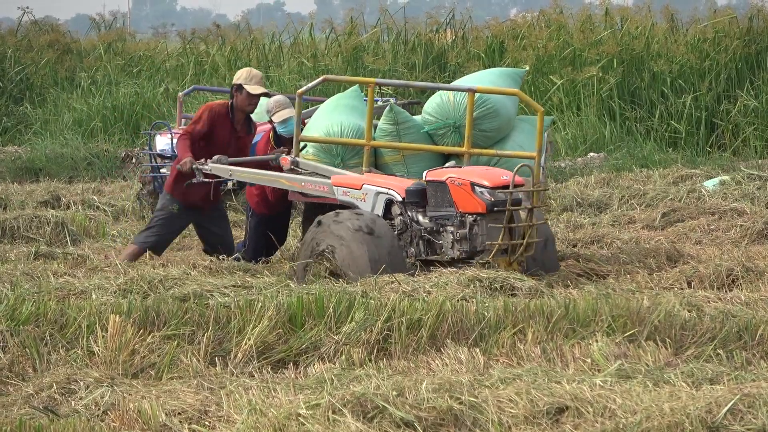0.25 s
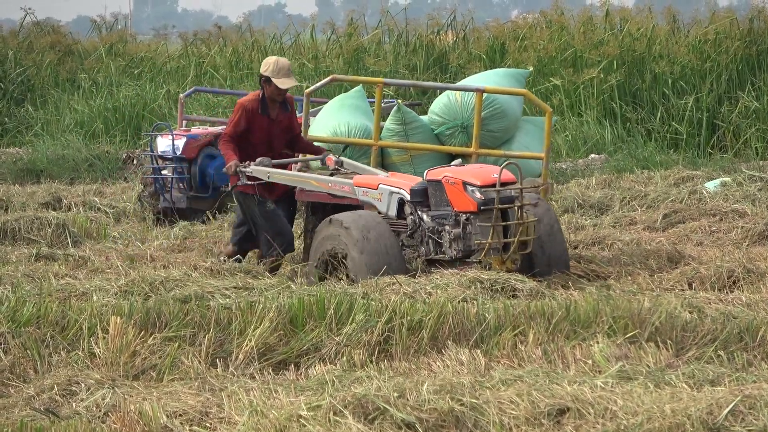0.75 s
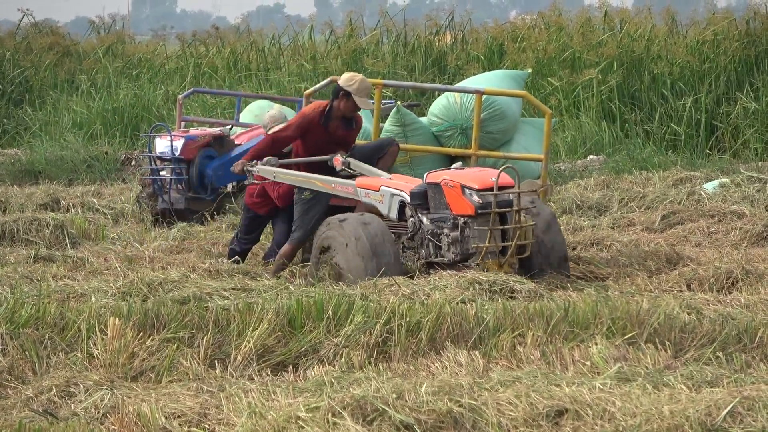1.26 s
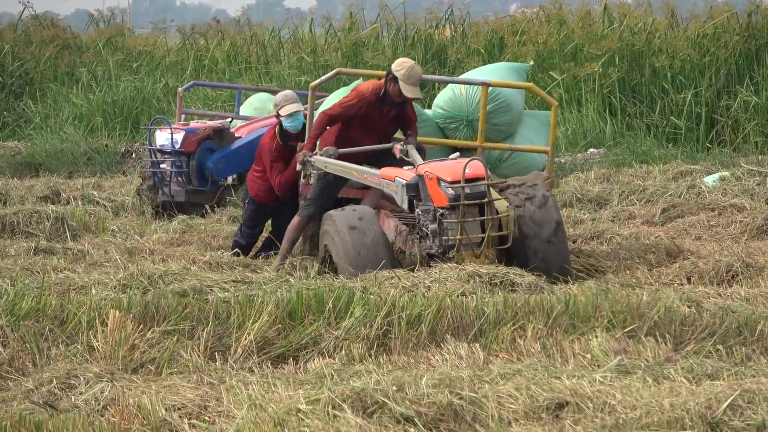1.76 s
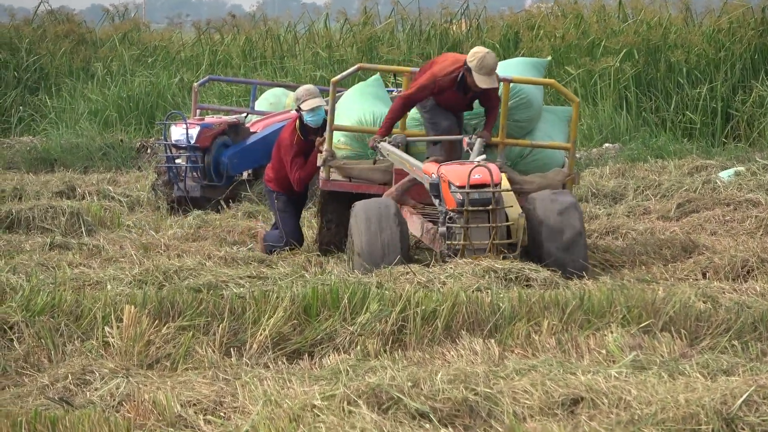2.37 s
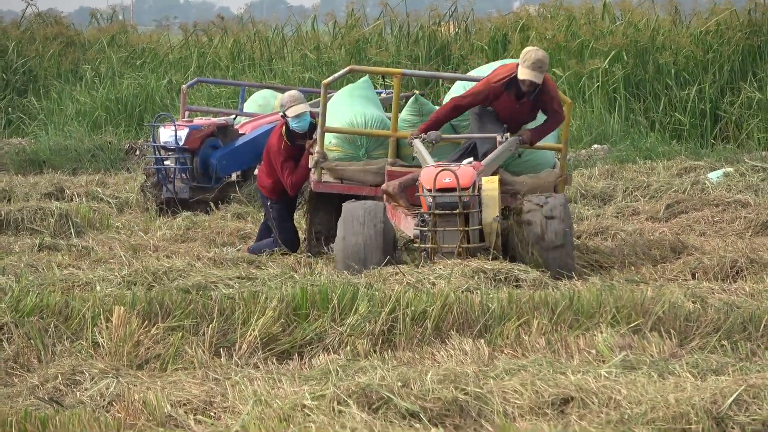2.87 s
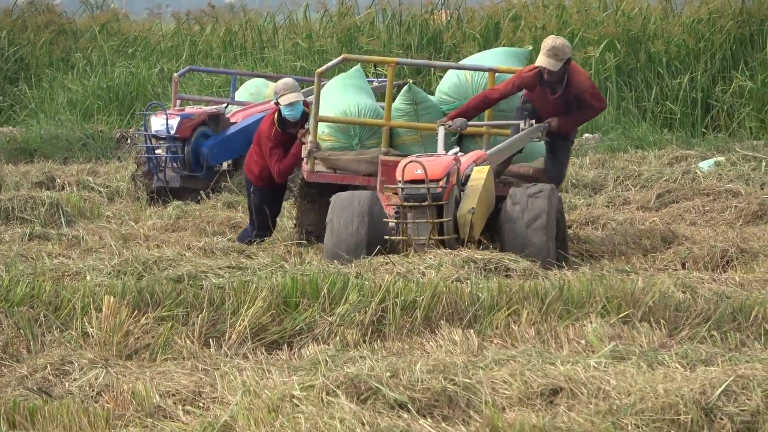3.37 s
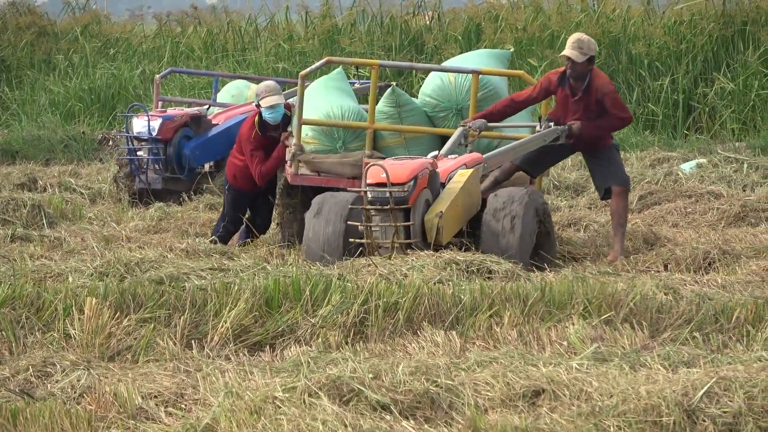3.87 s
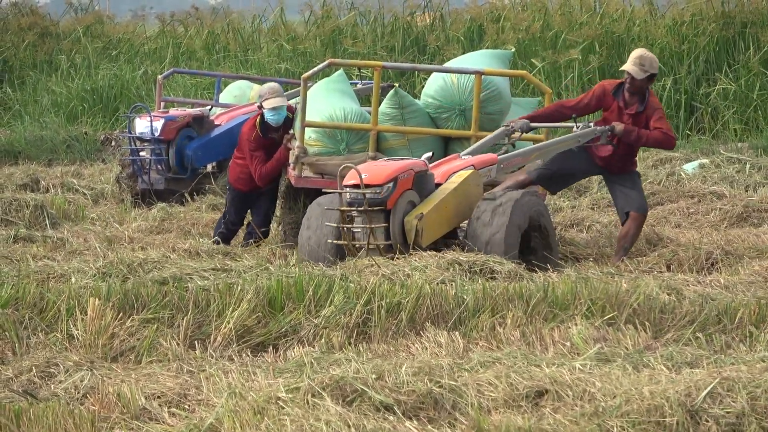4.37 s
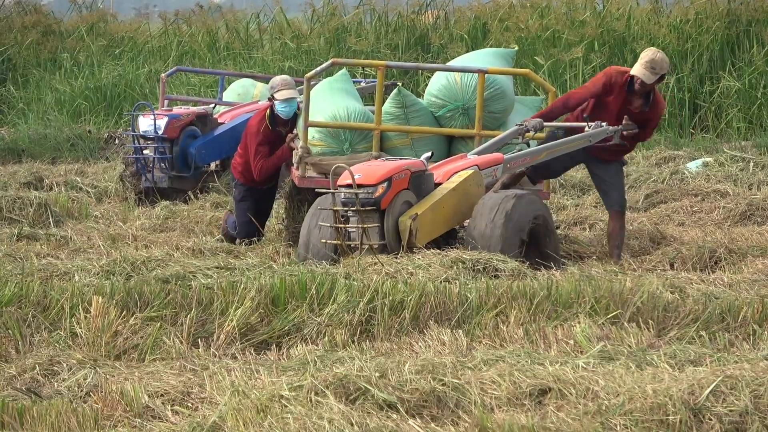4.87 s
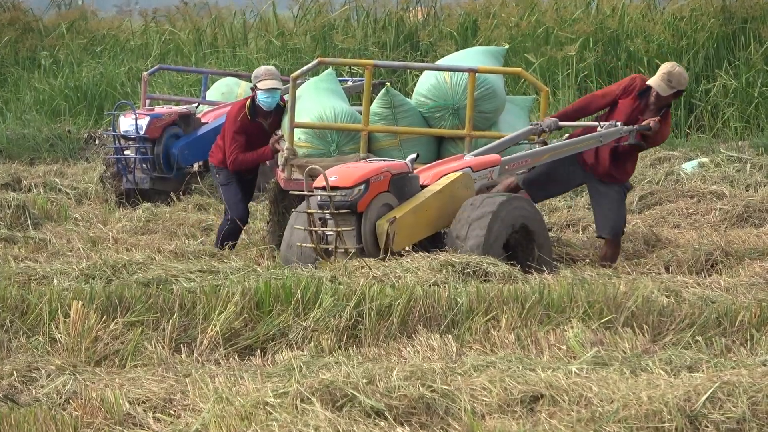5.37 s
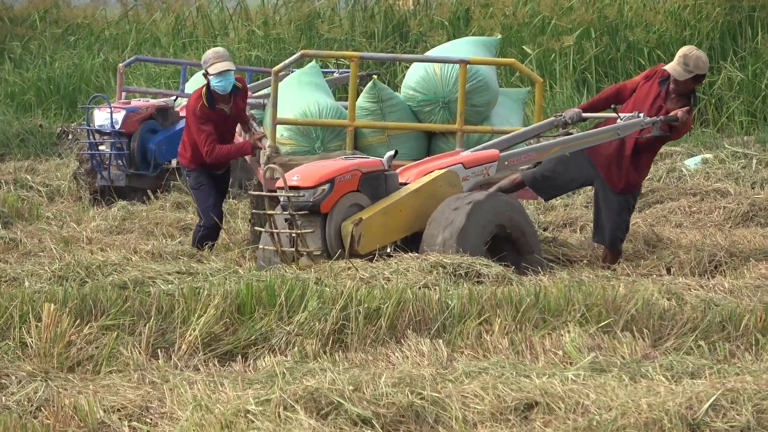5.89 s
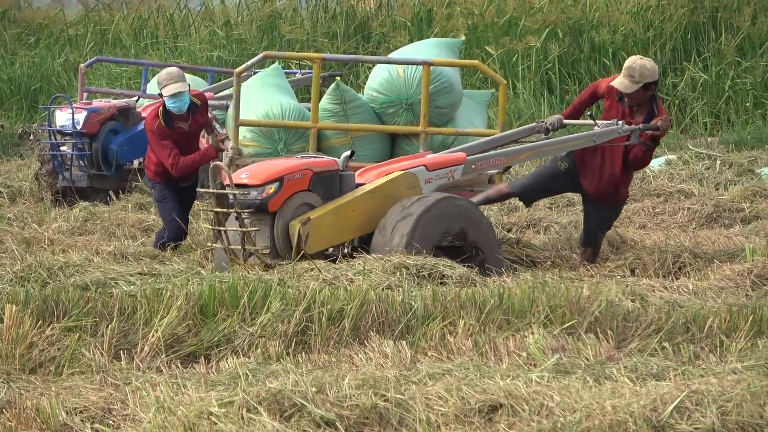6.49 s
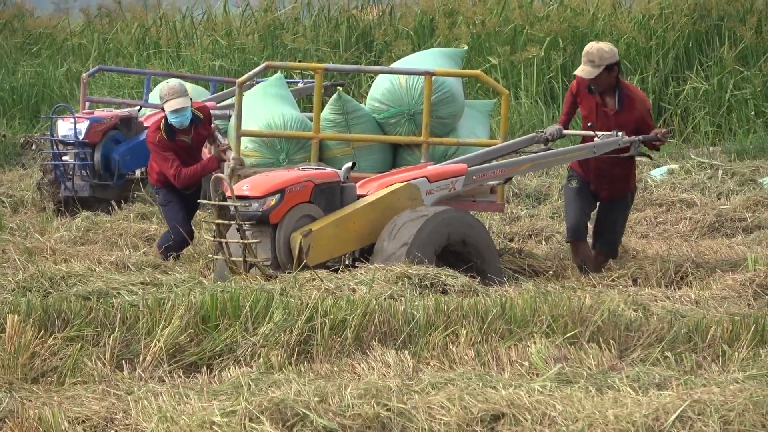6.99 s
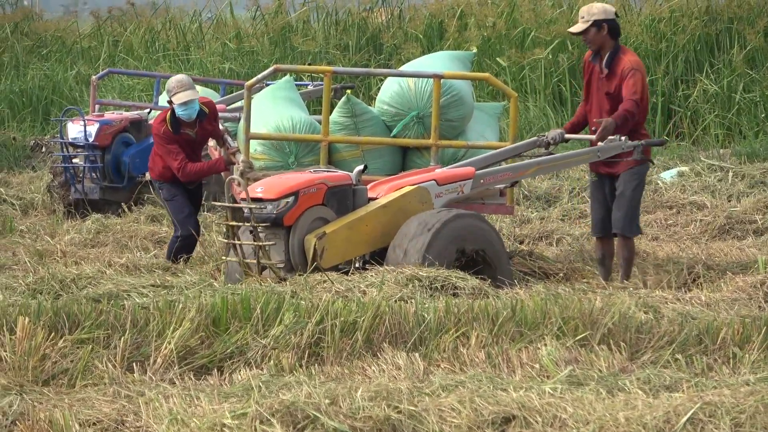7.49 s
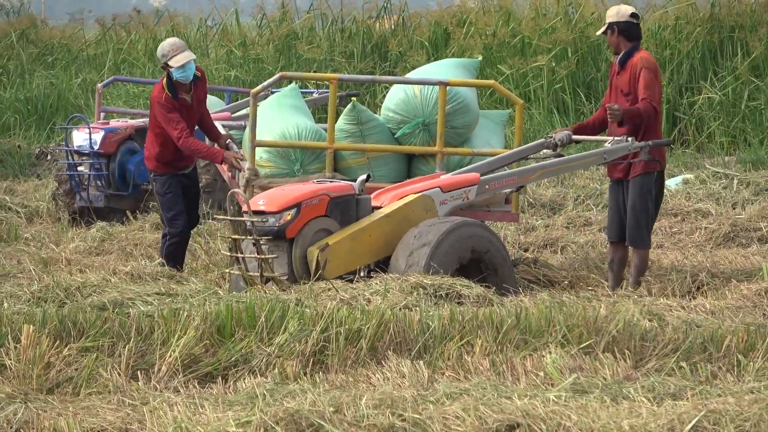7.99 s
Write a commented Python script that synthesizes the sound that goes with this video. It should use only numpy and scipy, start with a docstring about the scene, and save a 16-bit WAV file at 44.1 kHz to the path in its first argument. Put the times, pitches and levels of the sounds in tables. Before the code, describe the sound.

In an open field, a single-cylinder diesel walking tractor chugs about sixteen times a second, each beat a raspy exhaust puff, low thud and metallic knock over gear whirr. It surges under load, then near the end the throttle closes and it softens and slows. Wind rumbles, flutters and slaps the microphone, sometimes overloading it; tiny bird chirps are barely audible. Mono, dry, outdoors, at moderate distance.

```python
"""The uneven chug of a single-cylinder four-stroke diesel tractor, labouring in mud and swinging round.
Each cycle joins a noisy exhaust blast, low gas thuds and a combustion knock that rings block and casing;
fan, belt and gears whirr and whine. Near the end the throttle is shut and the engine runs down.
Wind noise rumbles, flutters and slaps on the microphone and now and then overloads it.
A faint bird whistles in short glides over the steady background hiss of the microphone."""
import sys
import numpy as np
from scipy import signal
from scipy.fft import rfft, irfft, next_fast_len
from scipy.io import wavfile
from scipy.ndimage import uniform_filter1d, map_coordinates

SR = 44100
rng = np.random.default_rng(int(sys.argv[2]) if len(sys.argv) > 2 else 0)


def generate_wav(signal):
    """Clip the signal to [-1, 1] and save it as 16-bit WAV at the path in sys.argv[1]."""
    frames = np.transpose(np.atleast_2d(signal))
    scaled = np.clip(frames, -1, 1) * 32767
    pcm = np.round(scaled).astype(np.int16)
    wavfile.write(sys.argv[1], SR, pcm)


N = 363384

# How hard the engine pulls as the wheels bite and slip. Each row: time in seconds, load in dB.
LOAD = [(0.0, -8), (0.55, -5), (0.68, -10), (1.05, -3), (1.91, -13), (2.34, 2.5), (3.07, -3), (3.2, -5.5),
        (3.44, 7.5), (4.06, -7), (4.67, 2), (4.86, -0.5), (5.04, 6), (5.23, -1.5), (5.66, 4), (6.09, -1.5),
        (6.4, 5), (7.26, 1), (7.38, -16), (8.24, -19.5)]
# How openly the engine's side faces the microphone as the tractor swings round.
# Each row: time in seconds, level in dB.
FACING = [(0, 8.5), (1.3, 4.5), (1.85, -2), (3.5, -2), (5, -0.5), (6.5, 2.5), (7.25, 2.5)]


def amp(db):
    """Decibels to gain."""
    return 10 ** (np.asarray(db) / 20)


def unit(x):
    """Scale to rms 1."""
    return x / np.sqrt(np.mean(x ** 2) + 1e-20)


def curve(rows):
    """Draw straight lines between (seconds, value) rows, one value per sample."""
    s, values = np.transpose(rows)
    return np.interp(np.arange(N) / SR, s, values)


def wobble(rate):
    """A smooth random curve with rate knots a second."""
    knots = rng.standard_normal(int(N * rate / SR) + 4)
    return map_coordinates(knots, [np.arange(N) * rate / SR])


def filtered(x, response):
    """Multiply the spectrum of x by a response of frequency in Hz."""
    size = next_fast_len(N + SR // 2)
    hz = np.fft.rfftfreq(size, 1 / SR)
    return irfft(rfft(x, size) * response(hz), size)[:N]


def noise(spectrum, envelope=1):
    """Noise of rms 1, shaped in time and then coloured by (Hz, dB) points on a log frequency scale."""
    points_hz, db = np.transpose(spectrum)

    def colour(hz):
        return amp(np.interp(np.log(hz + 1), np.log(points_hz), db))

    return unit(filtered(envelope * rng.standard_normal(N), colour))


def cycles():
    """Engine cycles run so far; one cycle is two turns of the crank, with one firing."""
    # Each row: time in seconds, firings per second.
    speed = [(0.0, 16.311), (0.9, 16.268), (1.3, 16.515), (2.0, 16.279), (2.5, 16.322), (3.1, 16.113),
             (3.8, 16.335), (5.0, 16.35), (6.4, 16.347), (7.2, 16.511), (7.4, 15.342), (7.65, 14.934),
             (8.24, 11.903)]
    start = .508  # share of the cycle already run at time zero
    return start + np.cumsum(curve(speed)) / SR


def strokes(degrees, scatter_db, jitter, advance=0):
    """One impulse a cycle at a crank angle, uneven in size (dB) and time (s); advance (degrees) is earlier."""
    run = cycles() + advance / 720
    marks = np.arange(int(run[-1]) + 1) + degrees / 720
    marks = marks[(marks > run[0]) & (marks < run[-1])]
    chance = rng.standard_normal((len(marks), 2))
    at = np.interp(marks, run, np.arange(N)) + jitter * SR * chance[:, 0]
    return np.bincount(np.clip(at, 0, N - 1).astype(int), amp(scatter_db * chance[:, 1]), N)


def ring(modes, blows, scatter_db, jitter, advance=0):
    """Decaying modes struck at crank angles, each at a new strength every time; each ring is cut at 0.1 s."""
    t = np.arange(SR // 10) / SR
    attack = 1 - np.exp(-t / .001)
    out = np.zeros(N)
    for hz, db, t60 in modes:
        hits = np.zeros(N)
        for degrees, blow_db in blows:
            hits += amp(blow_db) * strokes(degrees, scatter_db, jitter, advance)
        mode = attack * amp(db - 60 * t / t60) * np.sin(2 * np.pi * hz * t)
        out += signal.oaconvolve(hits, mode)[:N]
    return unit(out)


def run_down(drop_db, fade_db_per_s):
    """Level change in dB once the throttle is shut: a quick drop, and a steady fade as the flywheel slows."""
    shut_s, drop_takes_s = 7.18, 0.44
    since = np.maximum(np.arange(N) / SR - shut_s, 0)
    return -drop_db * np.minimum(since / drop_takes_s, 1) - fade_db_per_s * since


def mottled(x, depth_db, width_hz):
    """Give every engine cycle a slightly different colour, by a random gain over frequency."""
    hz, s, z = signal.stft(x, SR, nperseg=256)
    cycle = np.interp(s * SR, np.arange(N), cycles())
    knots = rng.standard_normal((64, 256))
    grid = np.meshgrid(hz / width_hz, np.floor(cycle), indexing="ij")
    field = map_coordinates(knots, grid, mode="nearest")
    return signal.istft(z * amp(depth_db * field), nperseg=256)[1][:N]


def exhaust():
    """The valve opens on a jet of gas that swells and dies in milliseconds; load makes it louder and brighter."""
    # Two colours of the blast. Each row: frequency in Hz, relative level in dB per Hz.
    hiss = [(1800, -39), (3200, -4), (4200, -3), (4800, -1.5), (5500, 2), (6150, -9.5), (6980, -1),
            (7300, -10.5), (10500, -9.5), (13000, -17.5), (15800, -32)]
    rasp = [(250, -27), (500, -14), (780, -15.5), (1000, -7), (1220, 3), (1600, -3.5), (2000, -.5),
            (2600, -2), (3400, -3), (4100, -7.5), (5000, -8), (8000, -42.5)]
    # Treble of the blasts, over what the load gives. Each row: time in seconds, level in dB.
    treble = [(0, 7), (1.1, 2), (1.35, -3), (1.8, 7), (2.3, -5), (2.55, -9), (3, 4.5), (3.55, 0), (3.8, 3),
              (5.1, -4), (5.55, -3.5), (5.9, 3.5), (6.6, -3.5), (7.25, -3.5), (7.8, 2.5)]
    load_db = curve(LOAD)
    # level at load 0, then dB per dB of load
    hiss_db = -45 + 1.3 * load_db + curve(treble)
    rasp_db = -43.5 + 0.96 * load_db

    swell_s, die_s = 0.003, 0.0023
    tail_db, tail_s = -13.5, 0.015  # scatter off the trailer
    intake_db, intake_after_s, intake_s = -21, 0.013, .0015  # the short hiss of air that follows
    t = np.arange(-SR // 10, SR // 10 + 1) / SR
    before, after = np.minimum(t, 0), np.maximum(t, 0)
    swell = np.exp(-np.abs(before / swell_s) ** 1.5)
    decay = np.exp(-(after / die_s) ** 1.2) + amp(tail_db) * np.exp(-after / tail_s)
    jet = swell * decay
    intake = amp(intake_db) * np.exp(-((t - intake_after_s) / intake_s) ** 2)
    short_jet = np.interp(t / 0.79, t, jet)  # the hiss lasts 0.79 times as long as the rasp

    out = np.zeros(N)
    # the jet is turbulent: its rasp and its hiss sputter on their own
    for spectrum, shape, db in (hiss, short_jet + intake, hiss_db), (rasp, jet, rasp_db):
        firings = strokes(degrees=200, scatter_db=1.2, jitter=.0002)
        sputter = amp(wobble(500))
        blasts = signal.oaconvolve(firings, shape, "same")
        out += amp(db) * noise(spectrum, sputter * blasts)
    return mottled(out, depth_db=2.5, width_hz=1227)


def thuds():
    """Exhaust opening, intake opening and intake closing each push out a low pulse; the cavities hum along."""
    # Gas pulses of one cycle. Each row: crank degrees after firing, relative level in dB,
    # centre in Hz, half length in seconds.
    pulses = [(202.5, 2.5, 192, 0.0022), (404.2, -1.5, 282, .0024), (598.7, 0, 143, 0.0019)]
    # Muffler and air cleaner. Each row: frequency in Hz, relative level in dB, 60 dB decay time in seconds.
    cavities = [(136, 5, 0.065), (292.7, -8, 0.4), (373.5, 2.5, 0.088), (444.5, -6, 0.075),
                (501, -11.5, 0.054), (615, -11, 0.044)]
    t = np.arange(-SR // 50, SR // 50 + 1) / SR
    out = np.zeros(N)
    for degrees, db, hz, length in pulses:
        pulse = amp(db) * np.cos(2 * np.pi * hz * t) * np.exp(-(t / length) ** 2)
        out += signal.oaconvolve(strokes(degrees, scatter_db=1, jitter=.00004), pulse, "same")
    hum = ring(cavities, [(190, 0)], scatter_db=1.2, jitter=.00004)
    # thuds weaken as the load drops; the negative fade only slightly offsets this
    thud_db = -32 + 0.27 * curve(LOAD) + run_down(drop_db=0, fade_db_per_s=-0.5)
    return amp(thud_db) * (unit(out) + amp(-10) * hum)


def knock():
    """Combustion, piston slap and valve ring the block; only combustion is sharp enough to crack the casing."""
    # Combustion first, then the other blows on the block.
    # Each row: crank degrees after firing, relative level in dB.
    blows = [(-16, -2.5), (66, -4.5), (175.5, 1.5), (392, -11)]
    # Engine block and thin casing. Each row: frequency in Hz, relative level in dB, 60 dB decay in seconds.
    block_modes = [(1065, -10, 0.06), (1174, -2, 0.041), (1230, -2, 0.068), (1321, 4, 0.02),
                   (1433, -3.5, 0.043)]
    casing_modes = [(2770, -7, 0.11), (3055, 4.5, 0.026), (3310, -2, 0.062), (3400, -9.5, 0.012)]
    # The crack of ignition. Each row: frequency in Hz, relative level in dB per Hz.
    crack_spectrum = [(700, -13), (1100, -3.5), (1420, 10.5), (1700, -12), (2400, -3), (3100, -9.5),
                      (3900, -10), (5400, -17), (7500, -25.5), (15000, -36.5)]
    # The fuel ignites earlier or later as the load changes. Each row: time in seconds, advance in crank degrees.
    timing = [(0, 14), (1.6, 14), (3.5, 6), (5, -4), (7.3, -10)]
    # Rise and fall of the block's ring. Each row: time in seconds, relative level in dB.
    block_level = [(0, -3), (1.35, 3), (1.66, -9), (2.03, 6.5), (3.2, -3.5), (3.44, 4), (3.87, -9),
                   (4.06, 6), (5.66, 3.5), (5.96, 1), (6.95, 0), (7.25, 2)]
    advance = curve(timing)
    block = ring(block_modes, blows, scatter_db=2, jitter=.0001, advance=advance)
    casing = ring(casing_modes, blows[:1], scatter_db=2, jitter=.00015, advance=advance)

    t = np.arange(SR // 20) / SR
    shock = (np.exp(-t / .002) + .15 * np.exp(-t / .01)) * (1 - np.exp(-t / .0006))
    ignitions = strokes(degrees=-18, scatter_db=1.5, jitter=.0001, advance=advance)
    crack = noise(crack_spectrum, signal.oaconvolve(ignitions, shock)[:N])

    block_db = curve(block_level) - 45.5 + run_down(drop_db=6, fade_db_per_s=17.5)
    ignition_db = curve(FACING) + run_down(drop_db=15.5, fade_db_per_s=12)
    casing_db = 0.06 * advance - 57  # early ignition rings the casing harder, in dB per degree
    return amp(block_db) * block + amp(ignition_db) * (amp(casing_db) * casing + amp(-53.0) * crack)


def running_gear():
    """Fan, belt and gears whirr, loudest with their side in view; one gear mesh whines in step with the crank."""
    # Colour of the whirr. Each row: frequency in Hz, relative level in dB per Hz.
    whirr_spectrum = [(150, -16.5), (400, 17), (750, -4), (1250, 6), (1750, -3.5), (3100, -5), (4000, -8.5),
                      (5500, -10), (6200, -22.5), (6950, -16), (7500, -21), (11000, -23.5), (15800, -30.5)]
    # Whine of the gears before the run-down. Each row: time in seconds, level in dB.
    whine_level = [(0, -62), (1, -53.5), (1.4, -72), (1.8, -55.5), (3, -71), (3.7, -58), (5.5, -61.5),
                   (6.3, -53), (7.25, -56.5)]
    whirr_db = .62 * curve(FACING) - 44.5 + run_down(drop_db=3, fade_db_per_s=6)
    whine_db = curve(whine_level) + run_down(drop_db=4, fade_db_per_s=20.5)
    whirr = noise(whirr_spectrum, amp(2.7 * wobble(150)))
    # 55.2 whine periods per engine cycle, with a little drift in phase
    mesh = np.sin(2 * np.pi * 55.2 * cycles() + .7 * wobble(25))
    return amp(whirr_db) * whirr + amp(whine_db + 0.98 * wobble(12)) * unit(mesh)


def wind():
    """Eddies on the microphone: deep rumble, faster flutter, spurts, rough flurries and single slaps."""
    # Strength of the wind, with a lull past the middle. Each row: time in seconds, strength in dB.
    strength = [(0.0, -5), (0.22, 2.5), (0.42, -3.5), (1.24, 0), (1.42, -2.5), (2.22, 2.5), (2.38, -7),
                (2.48, 0), (3.3, -0.5), (3.52, 2.5), (4.36, -3), (4.52, -9.0), (5.2, -11), (5.38, -4),
                (5.56, -7.5), (5.8, 4), (6.06, -1.0), (6.24, 4.5), (7.68, 3.0), (8.24, -3.5)]
    # Large, small and smallest eddies. Each row: frequency in Hz, relative level in dB per Hz.
    rumble_spectrum = [(2, -19), (6, -5.5), (14, -1), (33, -0.5), (48, -1), (62, -13.5), (100, -54),
                       (300, -130)]
    flutter_spectrum = [(30, -15.5), (57, 4), (85, 0), (130, -8), (200, -18), (320, -31), (500, -44),
                        (800, -59), (4000, -120)]
    rough_spectrum = [(20, -15), (70, 5), (150, -1), (300, -8.5), (600, -20), (1200, -35.5), (3000, -63.5),
                      (8000, -110)]
    # Rough flurries. Each row: centre in seconds, level in dB, half length in seconds.
    flurry_rows = [(0.207, -29, .006), (1.046, -31, 0.01), (5.782, -25, 0.023), (6.871, -18, 0.028),
                   (6.922, -16.5, 0.023), (7.028, -20, 0.011), (7.604, -22.5, 0.038), (7.625, -21, 0.012),
                   (7.896, -23.5, 0.024)]
    # Single eddies. Each row: centre in seconds, peak in dB, half length in seconds.
    slaps = [(.2147, -1.5, 0.0014), (0.222, -3.5, 0.0036), (1.056, -5.5, 0.0019), (1.342, -8.5, 0.0021),
             (3.696, -5, 0.0035), (5.787, -23, 0.0023), (6.665, -12, 0.0015), (6.868, -13.5, 0.00093),
             (6.912, -7, 0.0011), (7.034, -13.5, .0011), (7.334, -9.5, 0.0013), (7.635, -3, 0.0022),
             (7.643, -9.5, 0.00064)]
    gust_db = curve(strength) + 1.09 * wobble(7.9)
    t = np.arange(N) / SR
    rumble = noise(rumble_spectrum)
    # even out the rumble, so that the gusts set its strength
    rumble_power = np.abs(uniform_filter1d(rumble ** 2, size=SR // 8))
    rumble = unit(rumble / np.sqrt(rumble_power))
    flutter = noise(flutter_spectrum, amp(2.4 * wobble(45)))
    spatter = noise(rough_spectrum, amp(5.8 * wobble(90)))  # irregular spurts
    # level at wind 0, then dB per dB of wind: small eddies grow faster than large ones
    out = amp(-11 + 0.59 * gust_db) * rumble
    out += amp(-16.5 + 1.43 * gust_db) * flutter
    out += amp(-32 + 1.24 * gust_db) * spatter

    flurries = np.zeros(N)
    for s, db, length in flurry_rows:
        flurries += amp(db) * np.exp(-((t - s) / length) ** 2)
    out += flurries * noise(rough_spectrum, amp(4 * wobble(300)))
    for s, db, length in slaps:
        u = (t - s) / length
        # a pressure peak between two suctions as the vortex passes
        out += amp(db) * (1 - u ** 2) / (1 + u ** 2) ** 2
    return out


def bird():
    """Short, thin whistles, each a sine gliding from one pitch to another."""
    # Each row: start in seconds, length in seconds, start pitch in Hz, end pitch in Hz, peak in dB.
    chirps = [(.608, .014, 6950, 7150, -43), (1.41, 0.016, 7600, 7200, -48), (1.423, .02, 6750, 7260, -44),
              (7.783, .03, 4450, 4850, -53), (8.035, .065, 4280, 4950, -57), (8.157, .025, 7350, 7200, -65)]
    out = np.zeros(N + SR)
    for s, length, start_hz, end_hz, db in chirps:
        glide = np.linspace(start_hz, end_hz, int(length * SR))
        whistle = np.hanning(len(glide)) * np.sin(2 * np.pi * np.cumsum(glide) / SR)
        out[int(s * SR):][:len(glide)] += amp(db) * whistle
    return out[:N]


def microphone_hiss():
    """The faint, steady background hiss of the microphone, as coloured noise."""
    # Each row: frequency in Hz, relative level in dB per Hz.
    hiss_spectrum = [(800, -10), (3000, -4), (6000, -3), (11000, -3), (15800, -9)]
    return amp(-67) * noise(hiss_spectrum)


def scene():
    """The tractor in the open field, with wind, bird and the hiss of the microphone."""
    tractor = exhaust() + thuds() + knock() + running_gear()
    return (tractor + wind() + bird() + microphone_hiss())[None]


def record(dry):
    """The strongest peaks flatten at full scale; then everything above the band limit is removed."""
    top_hz = 15800
    clipped = dry[0] / (1 + np.abs(dry[0]) ** 12) ** (1 / 12)
    return filtered(clipped, lambda hz: hz < top_hz)[None]


dry = scene()
out = record(dry)
generate_wav(out)
```